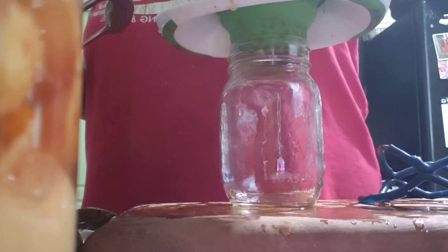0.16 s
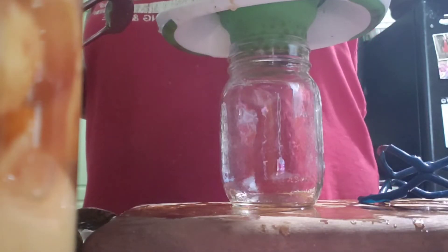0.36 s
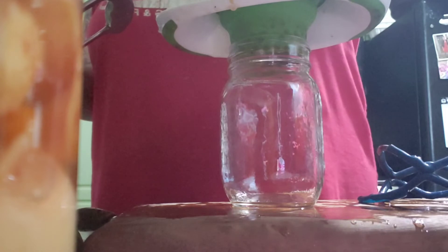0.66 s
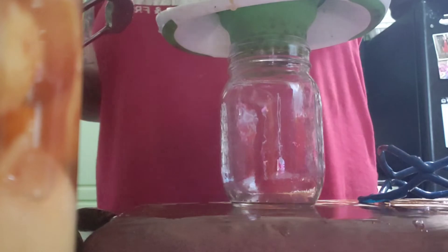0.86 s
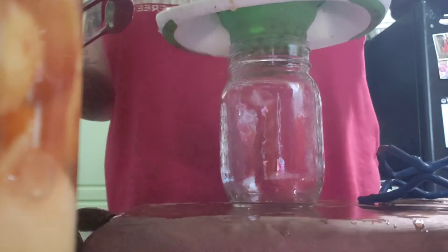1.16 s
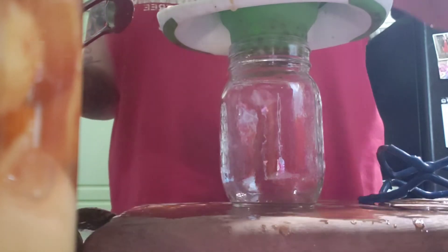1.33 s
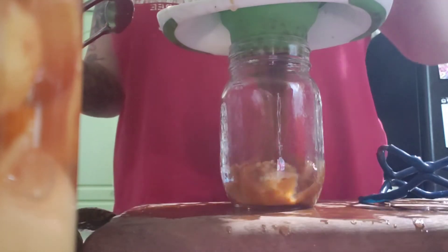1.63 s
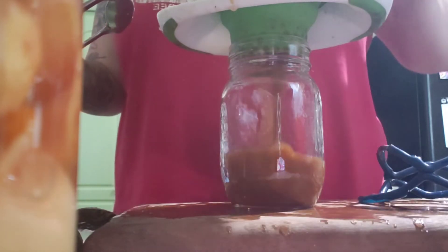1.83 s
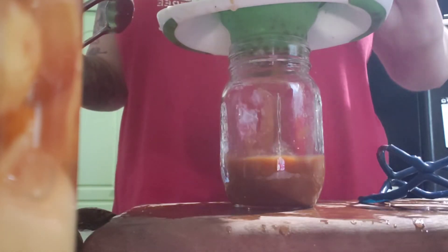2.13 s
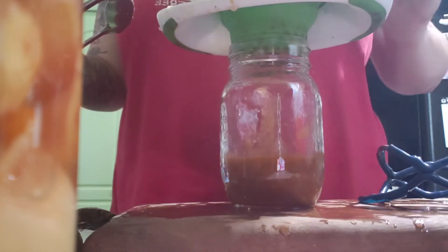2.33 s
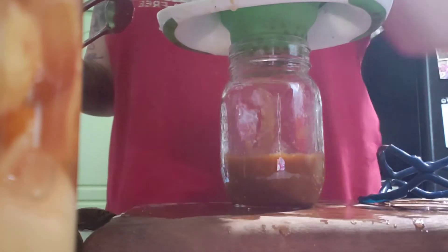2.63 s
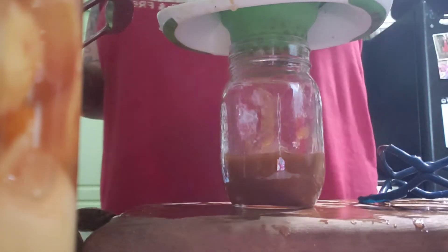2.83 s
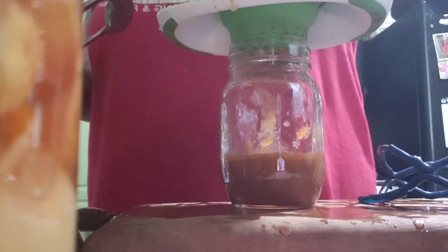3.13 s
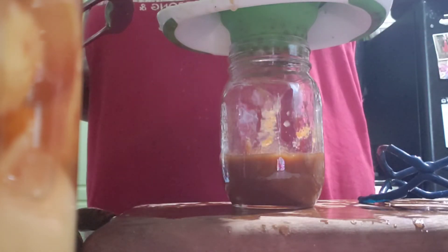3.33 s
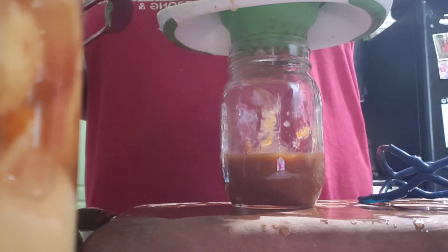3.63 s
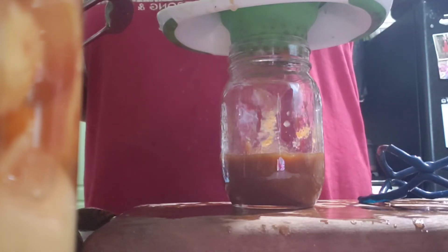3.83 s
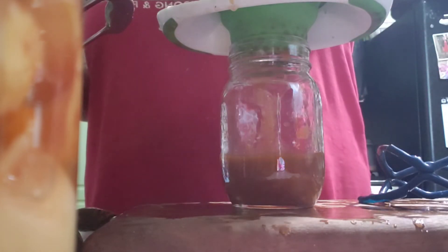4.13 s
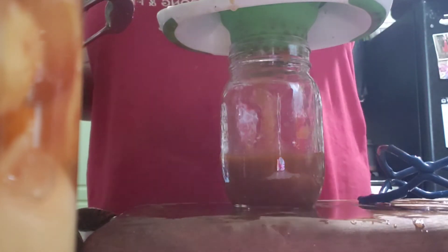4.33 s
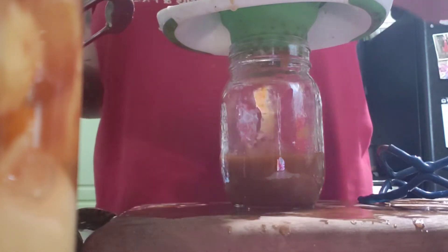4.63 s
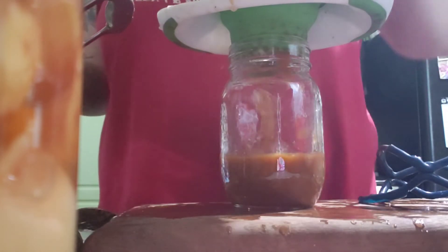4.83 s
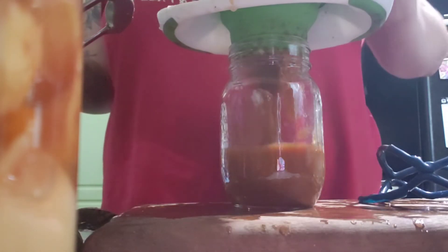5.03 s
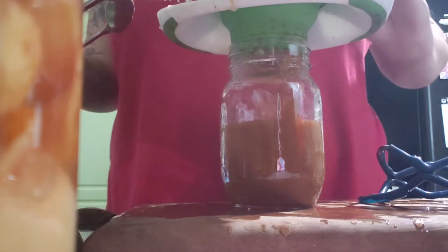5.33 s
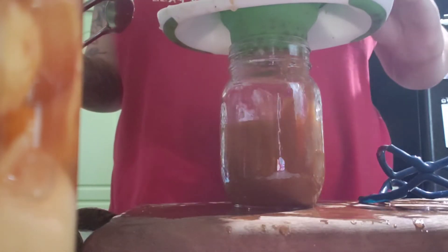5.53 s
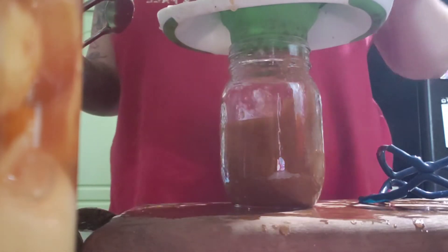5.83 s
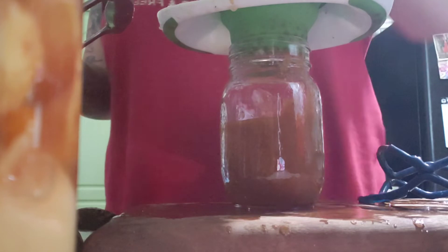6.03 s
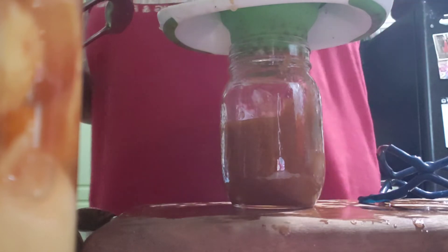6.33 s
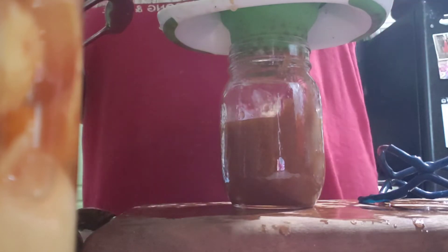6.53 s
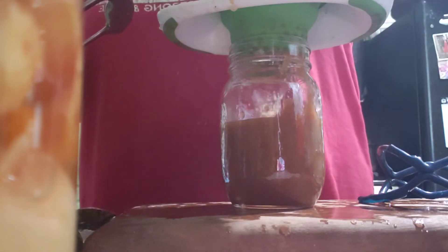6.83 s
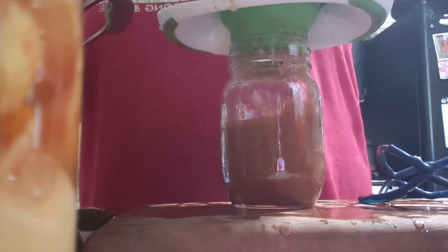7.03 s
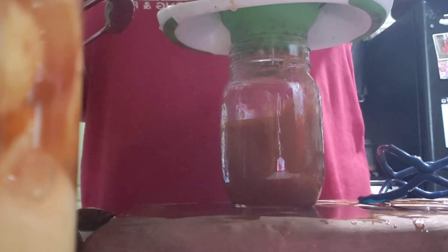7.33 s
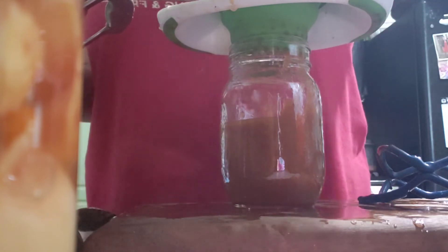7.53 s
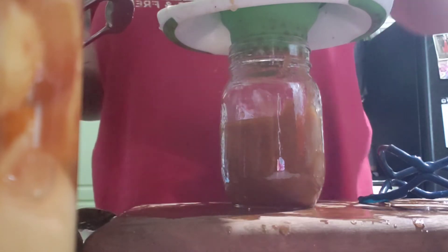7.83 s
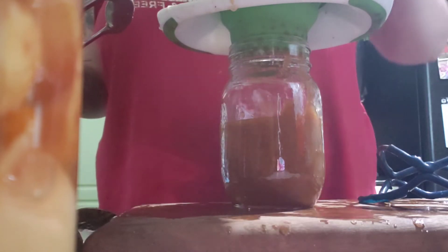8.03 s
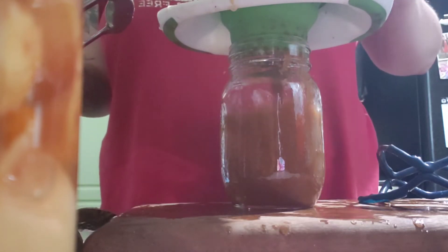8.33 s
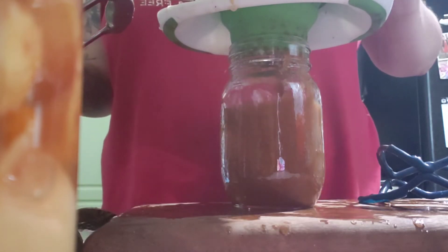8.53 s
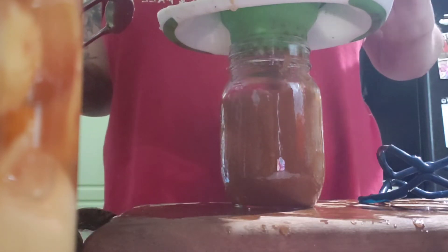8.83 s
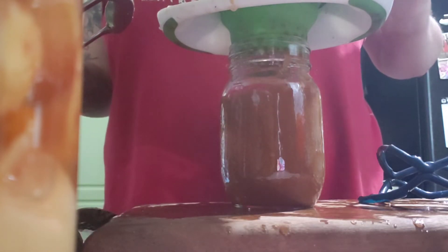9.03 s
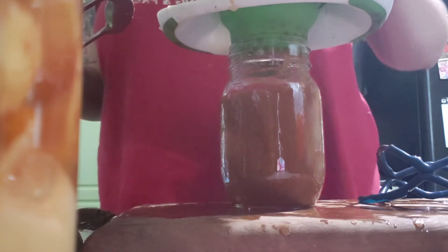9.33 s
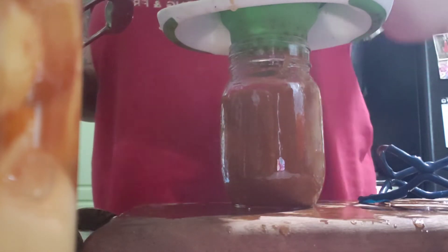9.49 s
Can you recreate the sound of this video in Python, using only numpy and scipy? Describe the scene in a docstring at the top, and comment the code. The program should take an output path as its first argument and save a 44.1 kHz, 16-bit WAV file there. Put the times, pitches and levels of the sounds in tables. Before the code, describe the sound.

A quiet low appliance hum with airy rush continues throughout a small kitchen, captured close in stereo. At 1.3 s there is a faint dull thump. From 1.6 to 2.3 s thick sauce slides through a plastic funnel with sticky crackles and tiny pings, a soft gurgle, then hollow plops clustered after 2.1 s in the glass jar. Soft ladle squelches follow from 2.7 s, with a weak plop in the pot at 3.1, a double clack at 3.2 and a short rough scrape at 3.3-3.5. More faint squelches lead to the second pour at 5.05-5.4 s: abrupt, heavy, wet splats with bright spatter. At 6.6 s three rapid knocks rattle the damped pot. After a hum-only pause, the third pour crackles from 8.35 s, plopping thickly at 8.5-8.7 and most strongly near 8.9, ending with a tiny tick around 9.4.

```python
"""Thick fruit sauce slides by the ladle through a plastic funnel into a glass jar, while an appliance hums.
A faint knock comes first; then the first pour crackles with noise ticks and pinging air pockets, gurgles
in low noise and plops as struck tones and wavering bubbles. Next the ladle squelches, knocks and scrapes the
pot (ringing tones, rough noise), with one plop in the pot. A second pour, more knocks and a third pour follow."""
import sys
import numpy as np
from scipy import signal
from scipy.fft import rfft, irfft, next_fast_len
from scipy.io import wavfile
from scipy.ndimage import uniform_filter1d

SR = 44100
rng = np.random.default_rng(int(sys.argv[2]) if len(sys.argv) > 2 else 0)


def store_pcm(level_fs):
    """Save levels as 16-bit WAV."""
    pcm = np.round(np.clip(level_fs, -1, 1) * 32767).astype(np.int16)
    wavfile.write(sys.argv[1], SR, np.atleast_2d(pcm).T)


N = 426006

# Plops of lumps and closing cavities, mostly in the jar, one in the pot; life is the time to fall 20 dB:
# start t/s, thud level/dB, slap level/dB, cavity level/dB, cavity f/Hz, cavity life/s
PLOP_EVENTS = [(1.9225, -34, -42, -52, 530, .012), (2.1239, -38, -26.5, -13.5, 720, 0.008),
               (2.158, -34, -31, -24.5, 510, 0.014), (2.1889, -22.5, -22.5, -12.5, 498, 0.023),
               (2.2509, -26.5, -30.5, -16.5, 510, 0.018), (2.269, -37, -35, -24.5, 490, 0.018),
               (2.327, -42, -34, -28.5, 509, 0.04), (3.1252, -43, -46, -34.5, 516, 0.02),
               (5.0638, -30, -29.5, -34, 546, 0.012), (5.0913, -24, -22.5, -22, 530, 0.0086),
               (5.1528, -48, -29.5, -29, 820, 0.0038), (5.1661, -15, -31, -13.5, 481, 0.018),
               (5.298, -11.5, -30, -19, 588, 0.025), (5.351, -41, -30, -38, 920, 0.0081),
               (5.3817, -39, -17, -13, 617, 0.0068), (8.466, -33, -43, -51, 600, .012),
               (8.519, -21.5, -26, -28, 836, 0.0089), (8.588, -22, -25.5, -26.5, 710, 0.015),
               (8.6297, -21.5, -27, -32, 1166, 0.015), (8.7111, -17, -21.5, -19, 860, 0.0037),
               (8.735, -31, -32, -41, 1100, 0.018), (8.9233, -12, -14, -10.5, 860, 0.0095),
               (8.9339, -32, -29, -19, 854, 0.011), (8.956, -32, -36, -26, 850, .016),
               (8.994, -21, -20.5, -21.5, 645, 0.014), (9.04, -40, -29.5, -21.5, 883, 0.013)]
# Loudest air pockets bursting, and two thin rings near 11 kHz (2.11 s, 5.26 s); life as above: start t/s, ping
# level/dB, f/Hz, ping life/s, spray level/dB
PINGS = [(1.653, -38, 4640, 0.011, -31.5), (1.6984, -43, 3160, 0.016, -36.5),
         (1.735, -42.5, 1540, 0.014, -32), (1.742, -40, 3430, 0.01, -30), (1.782, -44.5, 917, 0.028, -40),
         (1.833, -42.5, 3720, 0.022, -32), (1.872, -48, 766, 0.02, -40),
         (2.1138, -20.5, 10570, 0.0035, -23), (2.119, -19, 2680, 0.0051, -29),
         (2.1229, -19.5, 2940, 0.0067, -36), (2.3264, -23.5, 4420, 0.003, -42),
         (2.3273, -28.5, 4240, .009, -36), (5.0915, -27, 1120, .012, -50),
         (5.2598, -12, 10960, 0.0041, -16.5), (5.327, -38, 2400, 0.0038, -38),
         (8.394, -46, 2330, 0.0028, -45), (8.466, -42, 2854, 0.019, -32.5),
         (8.52, -19.5, 4740, 0.0024, -30.5), (8.5206, -36, 2990, 0.011, -44),
         (8.71, -43.5, 3220, 0.031, -30), (9.024, -39, 2500, .005, -42),
         (9.036, -34.5, 2220, 0.0059, -42), (9.364, -42.5, 4800, 0.0031, -69)]
# Ringing tones of pot and ladle: f/Hz, relative level/dB, time to fall 60 dB/s
POT_TONES = [(167, -1, 0.14), (268.5, -2, 0.14), (509.7, 2.5, 0.25), (559, -0.5, 0.21), (820, -7, 0.18),
             (1016, -1, 0.091), (1150, -8, 0.15), (1570, -13, 0.1), (2626, -25, 0.1), (3665, -15, 0.046)]
# Noise colour of the sauce spray: f/Hz, relative level/dB
SPRAY_COLOUR = [(600, -3), (1600, -14.5), (2200, -15.5), (4000, -7.5), (7500, -5), (9000, -14), (11000, -4),
                (15000, -10.5)]
MOUTH_PAN_DB = 1.5  # mouth of the jar: left minus right


def undb(db):
    """Turn decibels into a gain."""
    return 10 ** (np.asarray(db) / 20)


def seconds(length):
    """Make a time axis of the given length in seconds."""
    return np.arange(int(length * SR)) / SR


def fade(t, t60):
    """Die away exponentially, 60 dB down after t60 seconds."""
    return np.exp(-np.log(1000) * t / t60)


def peak(x):
    """Scale to a peak of 1."""
    return x / np.abs(x).max()


def unit(x):
    """Scale to a spread (standard deviation) of 1."""
    return x / x.std()


def pan(db):
    """Left and right gains for a source that is db louder on the left."""
    return undb([[db / 2], [-db / 2]])


def add(out, start, x):
    """Mix x into both channels from start (in seconds) on."""
    i = max(int(start * SR), 0)
    out[:, i:i + x.shape[-1]] += x[..., :N - i]


def colour(x, points):
    """Filter x so that its frequencies follow a curve through (Hz, dB) points."""
    hz, db = np.transpose(points)
    size = next_fast_len(x.shape[-1] + SR // 20)
    f = np.fft.rfftfreq(size, 1 / SR)
    gain = undb(np.interp(np.log(f + 1), np.log(hz), db))
    return irfft(rfft(x, size) * gain, size)[..., :x.shape[-1]]


def diffuse(size, apart_hz=1500):
    """Noise at two close microphone ports: nearly the same in the bass, unrelated from apart_hz up."""
    mid, side = rfft(rng.standard_normal((2, size)))
    share = np.clip(np.fft.rfftfreq(size, 1 / SR) / apart_hz, .16, 1)
    both = np.array([mid + share * side, mid - share * side])
    return irfft(both / np.hypot(1, share), size)


def walk(rate, size=N):
    """Smooth random drift with a spread of about 1, taking rate new values a second."""
    k = int(SR / rate)
    steps = np.repeat(rng.standard_normal(size // k + 1), k)
    smooth = uniform_filter1d(uniform_filter1d(steps, k), k)
    return unit(smooth[:size])


def burst(points, t60, rise):
    """A coloured noise that starts quickly and dies away."""
    t = seconds(.4)
    shape = peak((1 - np.exp(-t / rise)) * fade(t, t60))
    x = colour(diffuse(len(t)), points) * shape
    return .5 * x * shape.std() / x.std()


def ring(modes, rise, lag):
    """Struck tones die away, each at its own rate; the right port hears them lag seconds later."""
    t = np.maximum(seconds(.4) - np.array([[0], [lag]]), 0)
    detune = 1 + .004 * rng.standard_normal(len(modes))  # each strike is slightly off pitch
    x = 0
    for (hz, db, t60), shift in zip(modes, detune):
        x = x + undb(db) * np.sin(2 * np.pi * hz * shift * t) * fade(t, t60)
    return peak(x * (1 - np.exp(-t / rise)))


def sing(x, modes):
    """What a wall with these ringing tones gives off when x shakes it."""
    wall = ring(modes, rise=.001, lag=.0002)
    return signal.oaconvolve(x, wall / np.linalg.norm(wall[0]), axes=1)[:, :N]


def bubble(hz, life, rise, glide, waver, lag):
    """An air cavity with soft walls wavers in pitch as sauce closes over it; the right port lags."""
    t = np.maximum(seconds(2 * life + .008) - np.array([[0], [lag]]), 0)
    pitch = hz * (1 + glide * (t / life - .5) + waver * walk(hz, t.shape[1]))
    tone = np.sin(2 * np.pi * np.cumsum(pitch * (t > 0), axis=1) / SR)
    closing = 10 ** -(t / life) ** 2  # 20 dB down after life seconds
    return peak(tone * (1 - np.exp(-t / rise)) * closing)


def ping(hz, life):
    """A tiny air pocket; the sooner it collapses, the rougher its pitch, up to a limit."""
    hz = min(hz, 15000)
    return bubble(hz, life, rise=2 / hz, glide=0, waver=min(.00035 / life, .09), lag=.00005)


def mottle(x, patchy_db):
    """Colour x by a random curve, drawn anew for each spray."""
    hz = np.geomspace(1200, 16000, 24)
    return colour(x, np.column_stack([hz, patchy_db * rng.standard_normal(len(hz))]))


def room(dry, wet_db, t60, treble_t60):
    """Near surfaces echo first; a diffuse tail follows whose treble dies at its own rate."""
    # Echoes off counter and near walls: delay t/s, left gain (no unit), right gain (no unit)
    near_echoes = [(.0038, 0.032, 0.34), (.0079, 0.037, 0.18), (0.0177, 0.1, .09)]
    t = seconds(.6)
    noise = diffuse(len(t), apart_hz=925)
    low = signal.sosfilt(signal.butter(4, 3300, fs=SR, output="sos"), noise)
    high = signal.sosfilt(signal.butter(4, 5200, "high", fs=SR, output="sos"), noise)
    tail = (low * fade(t, t60) + high * fade(t, treble_t60)) * (1 - np.exp(-t / 0.0023))
    response = undb(wet_db) * tail / np.sqrt(np.sum(tail ** 2) / 2)
    for delay, left, right in near_echoes:
        response[:, int(delay * SR)] += left, right
    return dry + signal.oaconvolve(dry, response, axes=1)[:, :N]


def appliance():
    """A motor hums with wavering tones over an almost steady rush of air."""
    # Noise colour of the kitchen air: f/Hz, relative level/dB
    air_colour = [(25, -30), (58, -0.5), (80, -7), (120, 3), (200, -8.5), (420, -14.5), (800, -15.5),
                  (1050, -21.5), (2000, -32.5), (3300, -33.5), (4300, -29.5), (8500, -39.5), (11000, -35.5),
                  (16000, -43)]
    # Motor hum tones: f/Hz, middle rms level/dB
    hum_tones = [(56, -60.5), (118.7, -53), (342, -71)]
    air_db = -52  # level of the air above 200 Hz
    air = colour(diffuse(N), air_colour)
    above_hum = signal.sosfilt(signal.butter(4, 200, "high", fs=SR, output="sos"), air)
    rush = air / above_hum.std() * undb(air_db + .5 * walk(3.39))
    t = np.arange(N) / SR
    hum = np.zeros(N)
    for hz, db in hum_tones:
        level = np.sqrt(2) * undb(db + 2.0 * walk(6))
        hum += level * np.sin(2 * np.pi * hz * t + 1.66 * walk(7.3))
    return rush + hum


def squelches():
    """Soft uneven low noises: first a gurgle in the pour, then ladle squelches."""
    # A gurgle in the pour, then ladle squelches: start t/s, length/s, level/dB, centre f/Hz
    soft_noises = [(1.859, 0.063, -48.5, 496), (2.695, 0.18, -52, 600), (3.074, 0.12, -51, 676),
                   (3.62, 0.16, -49, 514), (4.293, 0.28, -60.5, 1390), (4.803, 0.17, -51, 520)]
    out = np.zeros((2, N))
    for start, length, db, hz in soft_noises:
        size = int(length * SR)
        soft = colour(diffuse(size), [(hz / 5, -16), (hz, 0), (hz * 2, -10), (hz * 8, -34)])
        uneven = soft * undb(3.4 * walk(68.6, size))
        add(out, start, undb(db) * unit(uneven * np.sqrt(np.hanning(size))))
    return out


def scrape():
    """The ladle's rim rubs unevenly along the pot, hardest past the middle; its upper tones sing."""
    start, length = 3.315, 0.17  # seconds
    rub_db, ring_db = -52, -9  # ring is relative to the rub
    size = int(length * SR)
    out = np.zeros((2, N))
    swell = np.sin(np.pi * (np.arange(size) / size) ** 2) ** .5
    rub = colour(diffuse(size), [(800, -5.0), (4500, -0.5), (8000, -9.5), (15000, -13)])
    rub = rub * undb(3.3 * walk(262, size))
    rub = undb(rub_db) * unit(rub * swell)
    add(out, start, rub)
    add(out, start, undb(ring_db) * sing(rub, POT_TONES[-3:]))
    return out


def knocks():
    """The ladle clacks and rattles on the pot, which rings briefly, damped by sauce, and thumps the stove."""
    # Ladle against the pot: start t/s, ring level/dB, thump level/dB, clack level/dB
    hits = [(1.278, -52, -28.5, -58), (3.2182, -22.5, -27, -16), (3.251, -27, -22, -51),
            (6.5987, -20.5, -18.5, -12), (6.6137, -27, -27, -18.5), (6.629, -21.5, -24, -25.5)]
    # Noise colours of rattle, thump and clack, each: f/Hz, relative level/dB
    rattle_colour = [(400, 11), (850, 17.5), (1200, -21), (3500, 0.5), (7000, -27)]
    thump_colour = [(35, -4), (130, 2), (380, -10), (1100, -21.5), (2000, -33), (8000, -55)]
    clack_colour = [(200, -11), (600, 0), (1150, 6), (2100, -8.5), (2700, -5.5), (6500, -10.5),
                    (9000, -21.5), (12000, -13), (15500, -21)]
    out = np.zeros((2, N))
    for start, ring_db, thump_db, clack_db in hits:
        add(out, start, undb(ring_db) * ring(POT_TONES, rise=0.001, lag=0.00027))
        add(out, start, undb(ring_db - 6.0) * burst(rattle_colour, t60=0.23, rise=0.00056))
        add(out, start, undb(thump_db) * burst(thump_colour, t60=0.12, rise=0.0023))
        add(out, start, undb(clack_db) * burst(clack_colour, t60=0.053, rise=0.00042))
    return out


def crackle():
    """Sauce sliding in the funnel tears into tiny ticks, mostly faint, over a sputtering wet hiss."""
    # Sauce sliding through the funnel: start t/s, length/s, level of the faintest ticks/dB
    slides = [(1.63, 0.59, -39.5), (5.059, 0.14, -34.5), (5.258, 0.135, -32), (8.342, 0.17, -42),
              (8.928, 0.15, -40)]
    out = np.zeros((2, N))
    for start, length, db in slides:
        for when, size, side in rng.random(size=(200, 3)):
            tick = undb(db + 12.0 * size ** 3) * np.array([[side], [1 - side]])
            add(out, start + length * when, tick)
        count = int(length * SR)
        hiss = colour(diffuse(count), [(900, -4), (2400, 8.0), (9000, -13.0)])
        hiss = hiss * undb(12.6 * walk(300, count))
        add(out, start, undb(db - 7.5) * unit(hiss * np.sqrt(np.hanning(count))))
    return colour(out, SPRAY_COLOUR)


def sprays():
    """Snapping films, opening pockets and plops throw short grainy sprays; heavier thuds throw more."""
    # Films of sauce snapping with no pocket to ring: start t/s, spray level/dB
    snaps = [(1.637, -32), (1.947, -36.5), (1.982, -30), (1.993, -32.5), (2.023, -28), (2.049, -38),
             (2.094, -33.5), (2.278, -38), (2.976, -41), (5.0644, -28), (5.1535, -44), (5.165, -26.5),
             (5.198, -36), (5.269, -33), (5.351, -26), (6.327, -39), (8.355, -37), (8.429, -39),
             (8.63, -31), (8.644, -30), (8.7107, -28.5), (8.923, -23)]
    plop_spray_db, spray_per_thud = -16.5, 0.72  # spray at a 0 dB thud; dB of spray per dB of thud
    grains_per_s, grain_db, patchy_db = 1412, 3.5, 6  # drift rate, its spread, spread of random colour
    out = np.zeros((2, N))
    from_pockets = [(start, spray_db) for start, *_, spray_db in PINGS]
    from_plops = [(start, plop_spray_db + spray_per_thud * thud_db) for start, thud_db, *_ in PLOP_EVENTS]
    for start, db in snaps + from_pockets + from_plops:
        hiss = burst(SPRAY_COLOUR, t60=0.037, rise=0.0017)
        grainy = hiss * undb(grain_db * walk(grains_per_s, hiss.shape[1]))
        drops = mottle(grainy, patchy_db)
        add(out, start, undb(db) * unit(drops) * hiss.std())
    return out


def pops():
    """Each row pings: the air pockets as they open, and two thin rings near 11 kHz."""
    out = np.zeros((2, N))
    for start, db, hz, life, _ in PINGS:
        add(out, start, undb(db) * ping(hz, life))
    return out


def plops():
    """Each plop mixes a thud, a slap of air and a ringing cavity that closes."""
    # Thud tones, as of the jar on the worktop: f/Hz, relative level/dB, time to fall 60 dB/s
    thud_tones = [(161, -1.5, 0.061), (232, -3.5, 0.052), (331, 8, 0.029)]
    # Tones of the air in jar and funnel: f/Hz, relative level/dB, time to fall 60 dB/s
    jar_tones = [(525, 4.5, 0.062), (698, 8, 0.041), (860, -1.5, 0.068), (1109, 4, 0.037),
                 (1560, -14.5, 0.036)]
    # Noise colour of the splat: f/Hz, relative level/dB
    splat_colour = [(80, -4), (300, -4), (600, -6.5), (1200, -17.5), (1500, -24), (6000, -41)]
    thud_pan_db = -3  # worktop: left minus right
    out = np.zeros((2, N))
    for start, thud_db, slap_db, cavity_db, hz, life in PLOP_EVENTS:
        splat = undb(-0.5) * burst(splat_colour, t60=0.082, rise=0.0006)
        slap = ring(jar_tones, rise=0.00041, lag=.0001) + splat
        cavity = bubble(hz, life, rise=0.0025, glide=-0.033, waver=0.039, lag=.00004)
        thud = ring(thud_tones, rise=0.00089, lag=0.00037)
        add(out, start, undb(thud_db) * thud * pan(thud_pan_db))
        add(out, start, undb(slap_db) * slap * pan(MOUTH_PAN_DB))
        add(out, start, undb(cavity_db) * cavity * pan(MOUTH_PAN_DB))
    return out


def scene():
    """The plops sound close, the pot further off to the left; the spatter makes the funnel ring."""
    # Tones of the plastic funnel: f/Hz, relative level/dB, time to fall 60 dB/s
    funnel_tones = [(1562, -3.5, 0.064), (2330, 2, 0.056), (2746, 0, 0.075), (2990, -1, 0.05),
                    (3326, -1.5, 0.071), (3770, -24, 0.048), (4240, -1, 0.052), (4670, 0, 0.031)]
    funnel_db, pot_pan_db = -11, 2.5  # how strongly the funnel rings; pot, left minus right
    wet = sprays() + crackle()
    funnel = undb(funnel_db) * sing(wet, funnel_tones)
    close = room(plops(), wet_db=-10.5, t60=0.4, treble_t60=0.49)
    spatter = room(pops() + wet + funnel, wet_db=-7.0, t60=0.31, treble_t60=0.26) * pan(MOUTH_PAN_DB)
    pot = room(knocks() + squelches() + scrape(), wet_db=-7.0, t60=0.3, treble_t60=0.27) * pan(pot_pan_db)
    # High-pass at 60 Hz keeps deep bass out of the handling sounds
    no_bass = signal.butter(3, 60, "high", fs=SR, output="sos")
    handling = signal.sosfilt(no_bass, close + spatter + pot)
    return handling + appliance()


def record(dry):
    """Each microphone port has its own treble resonance; the top is cut steeply."""
    # Response of the two microphone ports: f/Hz, left level/dB, right level/dB
    port_response = [(700, 0, 0), (2000, .7, -.5), (8500, 1, -.5), (10000, 1, -2), (10800, 5.5, -2),
                     (11600, -1, -1), (13000, -4.5, 4), (15500, -4, 3)]
    top_hz = 15700
    ports = np.array(port_response)
    left = colour(dry[0], ports[:, [0, 1]])
    right = colour(dry[1], ports[:, [0, 2]])
    top_cut = signal.ellip(8, .2, 70, top_hz, fs=SR, output="sos")
    return signal.sosfilt(top_cut, np.array([left, right]))


dry = scene()
out = record(dry)
store_pcm(out)
```